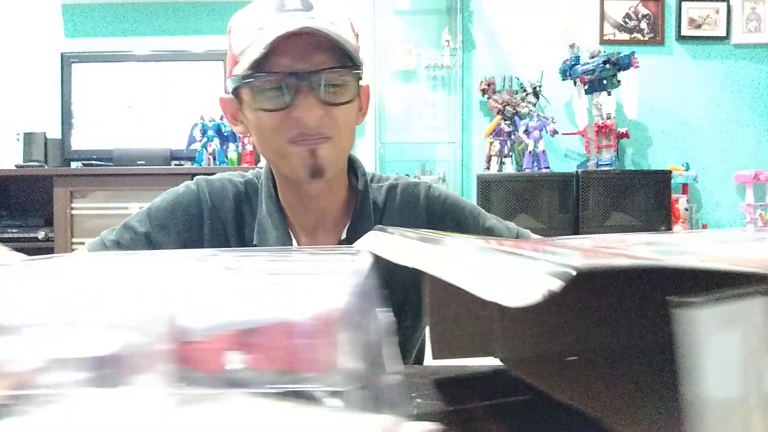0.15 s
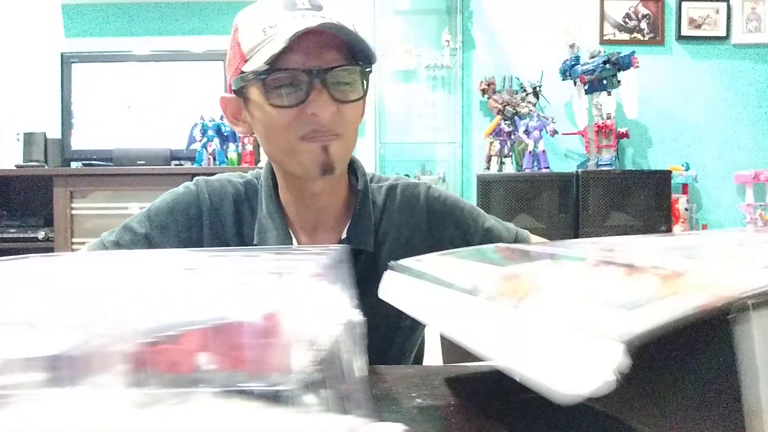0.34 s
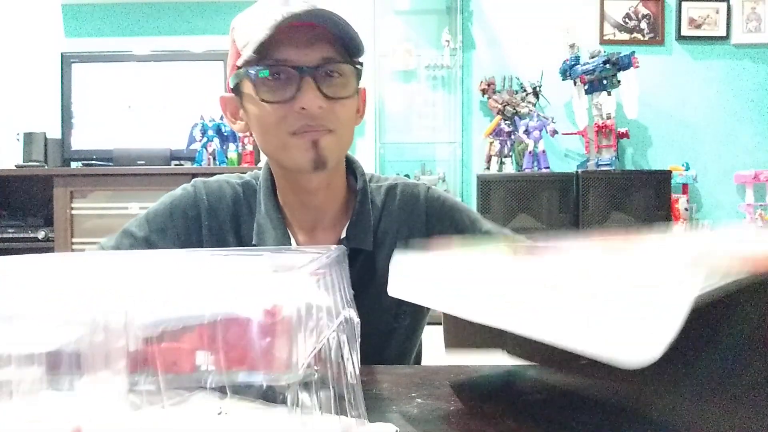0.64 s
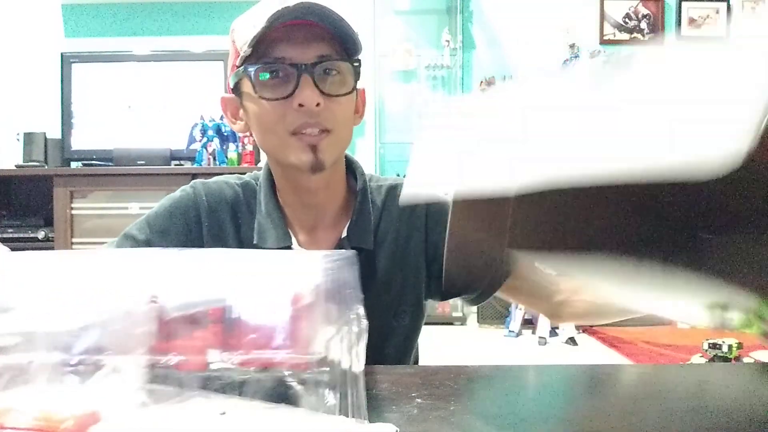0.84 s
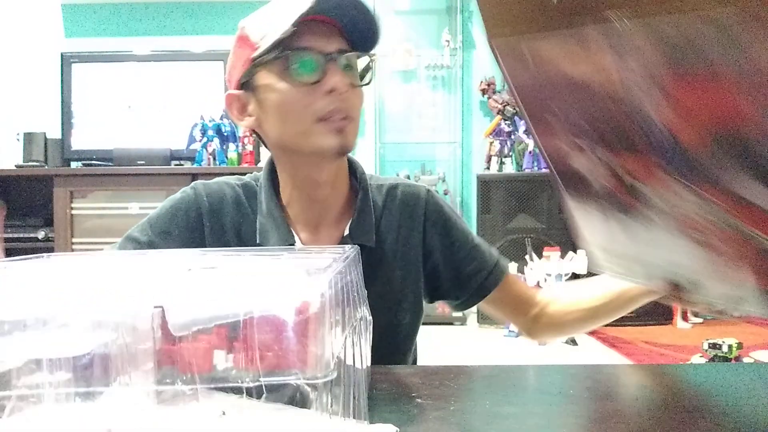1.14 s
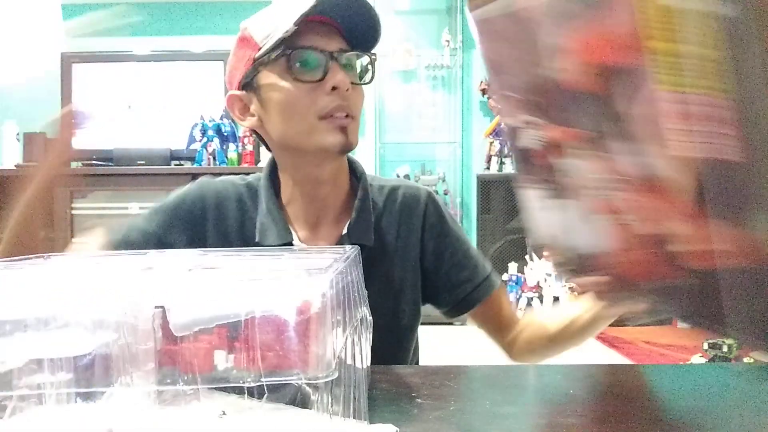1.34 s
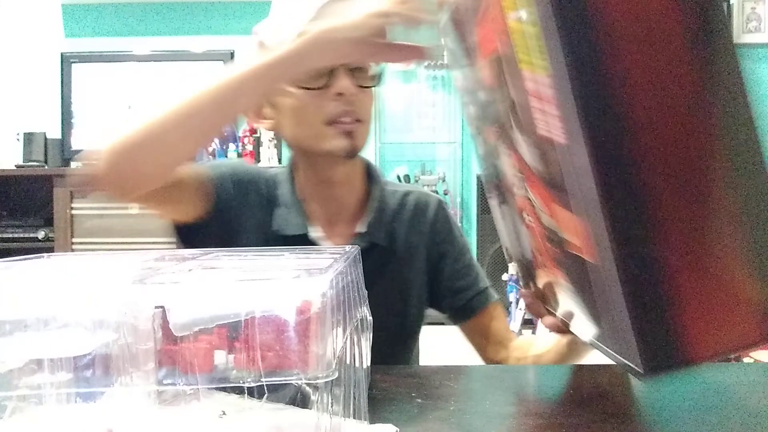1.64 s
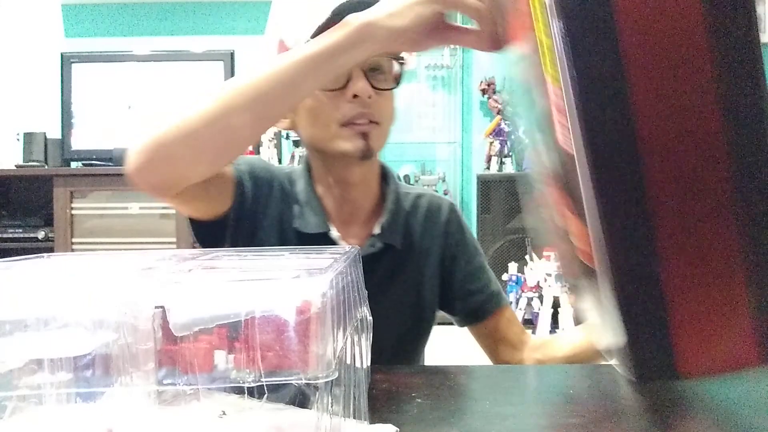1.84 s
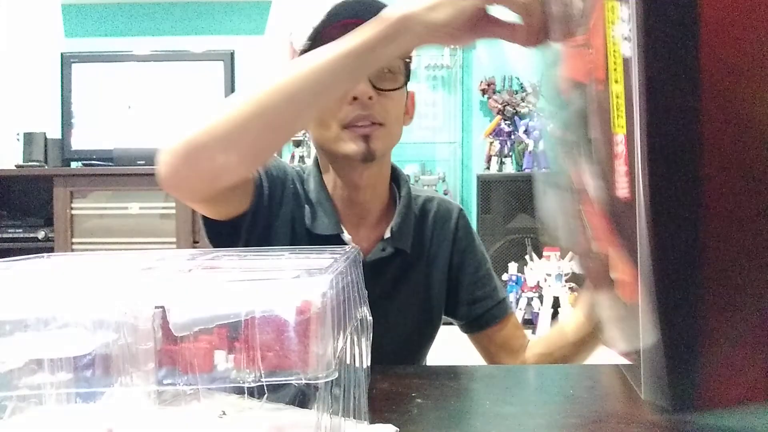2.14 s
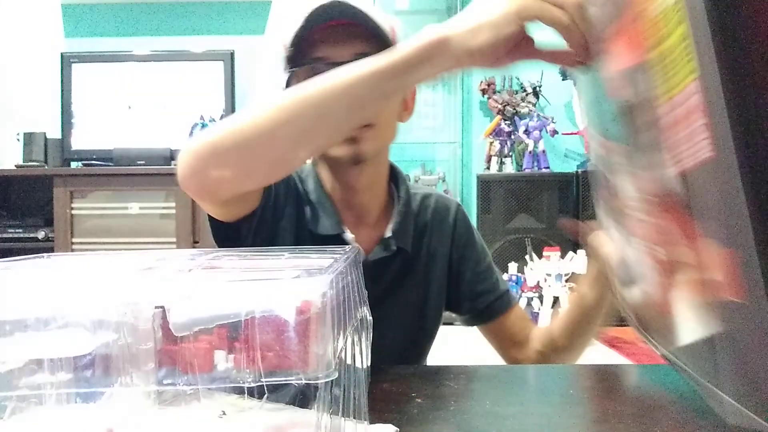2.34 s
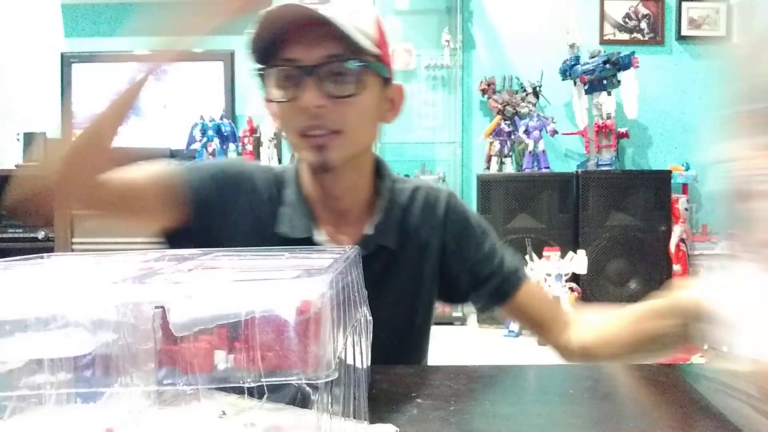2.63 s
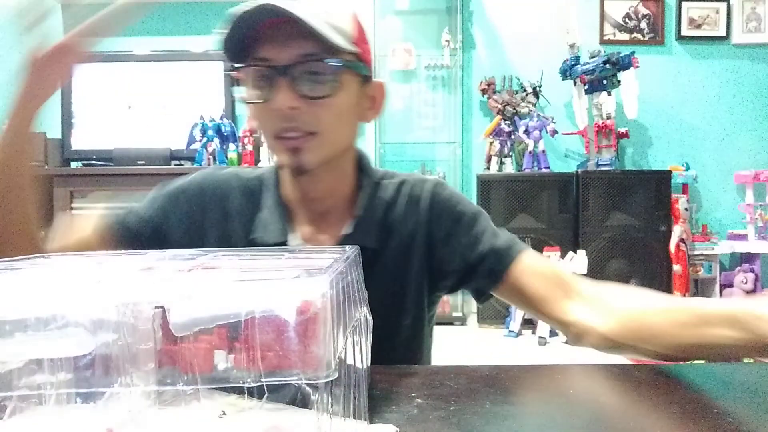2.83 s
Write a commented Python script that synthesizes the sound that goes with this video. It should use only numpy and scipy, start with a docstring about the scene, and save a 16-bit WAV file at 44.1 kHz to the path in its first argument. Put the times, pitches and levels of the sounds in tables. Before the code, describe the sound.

Close up in a small furnished room, light plastic ticks and card rubbing lead to a cluster of hollow box bumps and scuffs, then sparser taps, and finally one heavy low thump with faint sliding hiss.

```python
"""In a small furnished room with quiet air, a thin plastic tray is dragged out of a cardboard box on a table:
noisy slips rumble in the card and chatter in the tray walls, and ticks ring them.
From 0.2 s knocks ring the box and table as decaying tones, and edges scuff as short gritty bursts.
From 0.9 s smooth faces also slide with a fine hiss, as the empty box is lifted, turned and folded shut.
Near 2.6 s it drops with the loudest knock. Two close microphone ports hear it all, with room reflections."""
import sys
import numpy as np
from scipy import signal
from scipy.fft import rfft, irfft
from scipy.io import wavfile
from scipy.ndimage import uniform_filter1d, map_coordinates

SR = 44100
rng = np.random.default_rng(int(sys.argv[2]) if len(sys.argv) > 2 else 0)


def pcm_store(signal):
    """Save signal as 16-bit PCM."""
    levels = np.round(np.clip(np.atleast_2d(signal), -1, 1) * 32767)
    wavfile.write(sys.argv[1], SR, levels.astype(np.int16).T)


def nominal_scale(level):
    """Amplitude ratio for a level in decibels (scalar or array-like)."""
    x = np.asarray(level, float) / 20
    return 10 ** x


N = 132300
T = np.arange(N) / SR  # time in seconds

# where things happen, tray side -1 (left), box side 1 (right): time_s, place
PLACES = [(0,-1),(.35,-1),(.37,1),(.44,1),(.46,-1),(1.28,-.8),(1.33,.6),(1.6,0),(1.74,.8),(3,1.2)]
# shape of the room air's spectrum: pitch_hz, relative_db
AIR_SPECTRUM = [(18, -31.5), (30, 8), (303, -9.5), (526, -5), (616, -10), (866, -24), (962, -15.5),
                (2350, -16.5), (8980, -30.5), (14800, -23), (16000, -20)]
# how hard the card rubs: time_s, level_db
RUB_LEVELS = [(0,-49),(.07,-53.5),(.19,-50),(.23,-44),(.7,-52.5),(.9,-55),(1,-46),(1.1,-62),(1.14,-28),
              (1.24,-39),(1.4,-64.5),(1.62,-60.5),(1.68,-54),(1.73,-72.5),(1.8,-58),(1.87,-62),(1.92,-49.5),(2.02,-63),(2.08,-58.5),
              (2.46,-57),(2.5,-39),(2.57,-70.5),(2.63,-39),(2.8,-50.5),(3,-52.5)]
# ringing of box and table top, before each sound damps it: pitch_hz, level_db, t60_s (time to fall 60 dB)
BODY_MODES = [(52.2, 0, 1), (81.8, -20, 0.4), (105, 3.5, 0.39), (142.6, 5.5, 0.18), (173.5, -10, 0.55),
              (215, -2, 0.2), (255, -1.5, 0.14), (315, 10.5, 0.13), (369.8, 7.5, 0.14), (430, 3.5, 0.18),
              (487, 11, 0.13), (617, -4, 0.16), (747, 3.5, 0.23), (995, 11, 0.0654), (1314, 1, 0.11)]
# shape of the rubbing spectrum: pitch_hz, relative_db
RUMBLE_SPECTRUM = [(24, -38), (40, -7), (123, 3.5), (247, 2), (460, -8), (568, -6.5), (843, -10),
                   (923, -14), (1500, -13), (1950, -76), (3300, -120)]
# tray walls dragged along the flaps: time_s, level_db
DRAG_LEVELS = [(0,-60.5),(.15,-58.5),(.33,-52),(.45,-59.5),(.7,-66),(1,-74)]
# ticks that ring the tray walls: start_s, level_db
TRAY_TICKS = [(0.208,-40.5),(0.381,-42.5),(.477,-44),(.495,-46),(.541,-43),(.6,-51.5),(0.663,-50),
              (1.118,-38),(1.137,-45),(1.156,-40),(1.19,-40),(1.212,-41.5),(1.227,-51)]
# resonances of the tray walls: pitch_hz, width_hz, level_db
TRAY_MODES = [(1300, 200, -4), (1600, 130, 4), (2000, 150, -3), (2600, 250, -10), (4200, 250, -13)]
# knocks: start_s, peak_db (of the ringing), focus_hz (most excited pitch), damping (share of t60),
# reach_octaves (distance from the focus at which a mode is 11 dB weaker)
KNOCK_EVENTS = [(.2,-34.5,285,0.5,1.2),(0.224,-30.5,306,0.13,0.16),(.338,-36.5,139,0.47,0.6),
                (.381,-22.5,562,0.29,0.2),(.386,-21.5,275,0.37,0.84),(.396,-21,195,0.17,0.29),(0.392,-33.5,105,0.78,0.17),(0.477,-27,506,0.4,0.45),
                (0.602,-30.5,610,0.52,1.6),(0.611,-37.5,220,1.15,0.1),(0.661,-32.5,215,0.44,0.37),
                (.675,-34.5,443,0.22,0.94),(0.937,-26,320,0.63,1.15),(1.056,-36,400.3,0.54,0.088),(1.086,-36.5,153,0.36,0.53),(1.116,-23.5,132.4,0.12,0.3),
                (1.157,-22.5,255,0.23,0.99),(1.184,-19.5,308,0.09,0.86),(1.251,-29,162,0.14,0.67),
                (1.317,-53.5,1240,1.9,0.19),(1.347,-39.5,430,0.32,0.077),(1.677,-43.5,279,0.47,0.12),(1.7498,-19.5,306,0.39,0.67),(1.768,-24.5,197,0.29,0.34),
                (1.891,-28.5,485,0.7,0.28),(1.89,-30.5,140,0.52,0.39),(1.905,-30,264.5,0.54,0.22),(1.93,-45,500,0.89,0.18),(1.962,-39.5,505,0.89,0.3),(1.973,-33,214,0.16,0.16),
                (1.996,-34,124,0.28,0.37),(2.003,-45,580,0.47,0.15),(2.217,-24.5,105,1.3,0.35),(2.25,-29.5,105,1.04,1.06),
                (2.292,-45.5,500,0.6,0.13),(2.427,-35.5,184,0.35,2.2),(2.469,-35.5,437.5,1.03,0.6),(2.497,-29.5,155,0.16,0.59),(2.5988,-2.5,131.2,0.3,0.27),
                (2.606,-14.5,384,0.87,0.53),(2.606,-33,61,0.65,0.73),(2.6465,-11,145,0.43,0.15),(2.689,-22.5,147,0.68,0.5),
                (2.841,-34.5,910,0.13,1.1)]
# scuffs of edges: peak_time_s, level_db (6 dB come off later), tilt_db_per_octave, t60_s
SCUFF_EVENTS = [(.212,-29,9,0.067),(0.36,-46.5,6.5,0.18),(0.413,-43.5,7.5,0.08),(0.532,-38.5,7,0.073),
                (.631,-30.5,11,0.042),(0.706,-36.5,7,0.073),(0.839,-45.5,12,0.059),(0.874,-49,6.5,0.23),(.939,-18.5,-3.5,0.049),(1.029,-43.5,3.5,0.057),
                (1.116,-32.5,6,0.065),(1.19,-28.5,-1.5,0.054),(1.222,-28.5,-4,0.061),(1.75,-51,5,0.094),(1.89,-45,-3.5,0.052),
                (2.227,-39,6,0.13),(2.428,-46.5,3.5,0.071),(2.487,-52,8.5,0.17),(2.605,-38.5,-1.5,0.12),(2.842,-36,9,0.073)]
# shape of the scuffing and sliding spectrum: pitch_hz, relative_db
HISS_SPECTRUM = [(410, -57.5), (700, 7.5), (841, -30.5), (934, -4), (1560, 1), (2430, -1.5), (4150, -4.5),
                 (6570, -8.5), (8530, -23.5), (15500, -16), (16000, -39.5)]
# strokes of smooth faces: start_s, length_s, level_db, tilt_db_per_octave, low_hz (weaker below this)
SLIDE_STROKES = [(0.932,0.024,-42,-2.5,990),(1.107,0.077,-42,-0.5,835),
                 (1.639,0.024,-50,3,3400),(2.183,.04,-58,6.5,4050),
                 (2.615,.1,-55,5.5,2000),(2.673,0.13,-46,6.5,2100),(2.755,0.34,-50,6,2400)]
# the left port is brighter, the right as much duller: pitch_hz, left_db
LEFT_TREBLE = [(3000, -0.5), (14000, 2)]


def unit(x):
    """Scales to an average (rms) level of 1."""
    return x / np.sqrt(np.mean(x ** 2) + 1e-18)


def colour(x, points, tilt_db=0):
    """Shapes the spectrum by pitch_hz, level_db points and a tilt per octave about 4 kHz."""
    hz, db = np.array(points).T
    octave = np.log2(np.fft.rfftfreq(x.shape[-1], 1 / SR) + 1)
    gain_db = np.interp(octave, np.log2(hz), db) + tilt_db * (octave - 12)
    return irfft(rfft(x) * nominal_scale(gain_db), x.shape[-1])


def curve(rows):
    """Joins a table of times and values into a value for every sample."""
    return np.interp(T, *np.array(rows).T)


def grit(n, per_s, spread_db, bed):
    """Stick-slip: random clicks of uneven size over a bed of noise."""
    chance, sign, size = rng.random((3, n))
    clicks = (chance < per_s / SR) * np.sign(sign - 0.5) * nominal_scale(-spread_db * np.log(size + 1e-4))
    return unit(clicks) + bed * rng.standard_normal(n)


def walk(rate_hz):
    """A wandering level: random steps, smoothed, with a spread near 1."""
    hold = int(SR / rate_hz)
    steps = np.repeat(rng.standard_normal(N // hold + 1), hold)
    return 1.2 * uniform_filter1d(steps, hold)[:N]


def here(s):
    """Place of the action at time s."""
    return np.interp(s, *np.array(PLACES).T)


def place(x, where):
    """A source off centre reaches the nearer port earlier and louder."""
    port_lag_s, pan_db = 0.00024, 1  # between the two ports, for a place of 1
    i, lag = np.arange(len(x)), where * port_lag_s * SR / 2
    ports = [map_coordinates(x, [i - side * lag], order=3) * nominal_scale(-side * where * pan_db / 2)
             for side in (1, -1)]
    return np.array(ports)


def add(out, x, t):
    """Mixes a stereo event in at time t."""
    a = max(int(t * SR), 0)
    out[:, a:a + x.shape[1]] += x[:, :N - a]


def air():
    """Quiet room air: noise that wanders in level, alike at both ports only in the bass."""
    mid, side = colour(rng.standard_normal((2, N)), AIR_SPECTRUM)
    side = colour(side, [(60, -45), (300, -2.5), (1200, 1.5), (16000, 0)])
    return unit(np.array([mid + side, mid - side])) * nominal_scale(-60 + walk(3.66))


def rub():
    """Card drags on card and table: uneven slips drive the box modes, here heavily damped."""
    slips = grit(N, per_s=500, spread_db=2.5, bed=0.6) * nominal_scale(3 * walk(25))
    ring = 0
    for hz, db, t60 in BODY_MODES:
        sharpness = hz * t60 * 0.23 / 5.6
        ring = ring + nominal_scale(db) * signal.lfilter(*signal.iirpeak(hz, sharpness, SR), slips)
    ringing = unit(colour(ring, RUMBLE_SPECTRUM))
    direct = unit(colour(slips, RUMBLE_SPECTRUM))
    return place(nominal_scale(curve(RUB_LEVELS)) * unit(1.07 * ringing + 0.39 * direct), here(T))


def drag():
    """The tray's two thin side walls chatter in their resonances while it moves and ring at each tick."""
    tick_t60_s = 0.064
    out, force = 0, nominal_scale(curve(DRAG_LEVELS))
    for s, level_db in TRAY_TICKS:
        force = force + (T >= s) * nominal_scale(level_db - 60 * np.abs(T - s) / tick_t60_s)
    for where in (-1, -0.2):  # the two walls
        slips = grit(N, per_s=1500, spread_db=3, bed=0.6)
        wall = 0
        for hz, width_hz, db in TRAY_MODES:
            ring = signal.lfilter(*signal.iirpeak(hz, hz / width_hz, SR), slips)
            wall = wall + nominal_scale(db + 4 * walk(25)) * ring  # each resonance wanders in level
        wall = colour(wall, [(900, -14), (1300, 0), (4500, 0), (8000, -14)])
        out = out + place(unit(wall) * force, where)
    return out


def room(x):
    """Diffuse reflections: noise tails, treble dying first, unlike left and right above the bass."""
    t60_s, dull_t60_s, level_db = 0.52, 0.29, -11  # bass decay, treble decay, loudness
    t = T[:SR // 2]
    mid, side = rng.standard_normal((2, SR // 2))
    side = colour(side, [(60, -10), (300, -13.5), (1000, 7), (16000, 1)])
    tail = np.array([mid + side, mid - side])
    low = colour(tail, [(20, 19), (1200, -25.5), (5000, -24)])
    tail = low * nominal_scale(-60 * t / t60_s) + (tail - low) * nominal_scale(-60 * t / dull_t60_s)
    tail = tail * (t > 0.003)  # the first reflection takes a moment
    tail = colour(tail, [(60, 3), (250, 3), (16000, -1)])
    tail = tail / np.sqrt((tail ** 2).sum() / 2)
    return signal.fftconvolve(x.mean(0)[None], tail, axes=1)[:, :N] * nominal_scale(level_db)


def knocks():
    """A short push rings the modes whose pitch is near its focus; the card rattles briefly."""
    push_cycles, rattle_db, rattle_t60_s = 0.8, -11.5, 0.11
    # modes reach the two ports out of step, less so below in_step_hz
    spread_rad, in_step_hz = 0.4, 150
    out, t = np.zeros((2, N)), T[:SR // 2]
    hz, db, t60 = np.array(BODY_MODES).T[:, :, None]
    spread = spread_rad * np.minimum(hz / in_step_hz, 1) ** 2
    for s, peak_db, focus_hz, damping, reach in KNOCK_EVENTS:
        vary_level, vary_pitch, vary_side = rng.standard_normal((3, len(BODY_MODES), 1))
        distance = np.log2(hz / focus_hz) / max(reach, 0.08)
        gain = nominal_scale(db + 1.5 * vary_level - 11 * distance ** 2)
        decay = nominal_scale(-60 * t / (t60 * max(damping, 0.05)))
        modes = gain * np.exp(2j * np.pi * hz * (1 + 0.0045 * vary_pitch) * t) * decay
        ring = modes.imag.sum(0)
        side = (spread * vary_side * modes.real).sum(0)
        rattle = colour(rng.standard_normal(SR // 2), [
            (focus_hz / 2, -20), (focus_hz, 0), (2.26 * focus_hz, -15), (4000, -52), (16000, -70)])
        rattle = unit(rattle) * nominal_scale(-60 * t / rattle_t60_s) * nominal_scale(rattle_db)
        push = 1 - np.exp(-(t * focus_hz / push_cycles) ** 2.84)  # soft start
        top = np.abs(ring * push).max()
        x = place((rattle - ring / top) * push, here(s)) + np.outer([1, -1], side / top * push)
        add(out, x * nominal_scale(peak_db), s)
    return out


def scuffs():
    """An edge catches and slips: a gritty burst swells and dies; dull cracks start more abruptly than bright ones."""
    lead_s = 0.04  # each burst begins this long before its peak
    out, t = np.zeros((2, N)), T[:SR // 3] - lead_s
    for s, level_db, tilt_db, t60 in SCUFF_EVENTS:
        t60 = max(t60, 0.01)
        rise_share = max(0.2 + 0.057 * tilt_db, 0.05)  # rise time as a share of t60
        shape = nominal_scale(-60 * np.where(t < 0, -t / rise_share, t) / t60)
        grain = grit(len(t), per_s=6500, spread_db=3.75, bed=0.62)
        x = place(grain, here(s)) + 5.2 * rng.standard_normal((2, len(t)))
        x = unit(colour(x, HISS_SPECTRUM, tilt_db))
        add(out, x * shape * nominal_scale(level_db - 6), s - lead_s)
    return out


def slide():
    """Smooth faces slide: a fine even hiss starts, holds and trails off; the whole face radiates."""
    fade_t60_s = 0.18
    out, flutter, t = np.zeros((2, N)), nominal_scale(1.2 * walk(45)), T[:SR * 3 // 4]
    for s, length, level_db, tilt_db, low_hz in SLIDE_STROKES:
        rise_s = min(3.8 * length ** 2, 0.041)  # short strokes start faster
        fade = nominal_scale(-60 * np.maximum(t - length, 0) / fade_t60_s)
        shape = (1 - np.exp(-(t / rise_s) ** 2)) * fade
        grain = grit(len(t), per_s=5000, spread_db=3, bed=0.6)
        x = place(grain, here(s)) + 1.3 * rng.standard_normal((2, len(t)))
        x = colour(x, HISS_SPECTRUM, tilt_db)
        x = colour(x, [(low_hz / 1.47, -16), (low_hz, 0)])
        add(out, unit(x) * shape * nominal_scale(level_db), s)
    return out * flutter


def scene():
    """All sources, their reflections and the room air."""
    near = rub() + drag() + knocks() + scuffs() + slide()
    return near + room(near) + air()


def band_limit(x):
    """A steep low-pass at the top of the band."""
    return signal.sosfilt(signal.butter(12, 16600, fs=SR, output="sos"), x)


def record(dry):
    """The two ports differ in the treble and lose the deepest bass and the very top."""
    right_treble = [(hz, -db) for hz, db in LEFT_TREBLE]
    mix = np.array([colour(dry[0], LEFT_TREBLE), colour(dry[1], right_treble)])
    mix = signal.sosfilt(signal.butter(6, 49, "high", fs=SR, output="sos"), mix)
    mix = signal.sosfilt(signal.ellip(8, 0.2, 70, 15750, fs=SR, output="sos"), mix)
    return band_limit(mix)


dry = scene()
out = record(dry)
pcm_store(out)
```